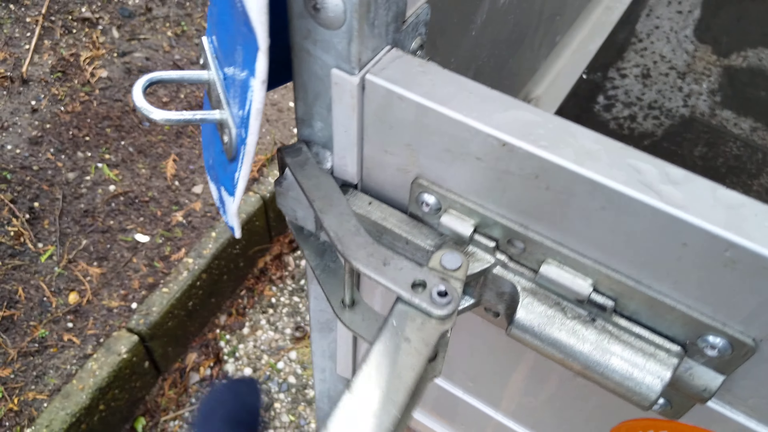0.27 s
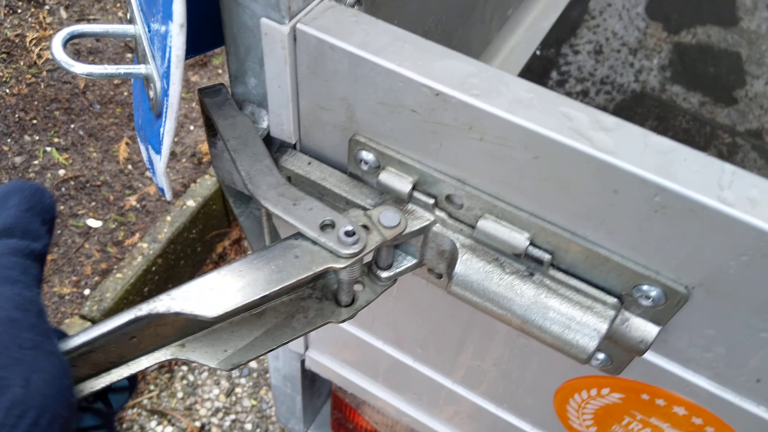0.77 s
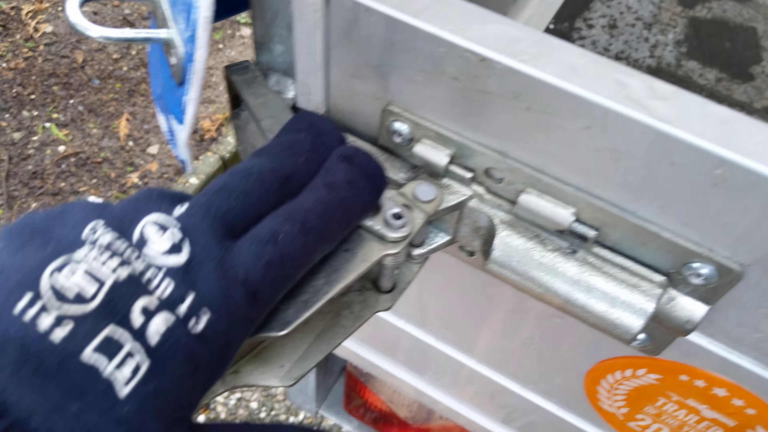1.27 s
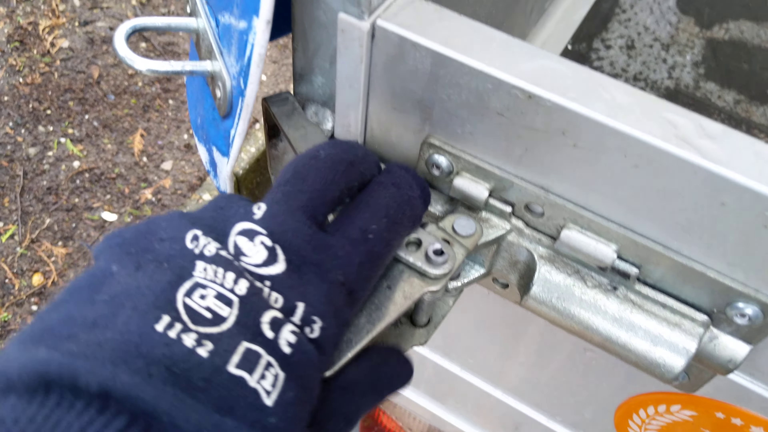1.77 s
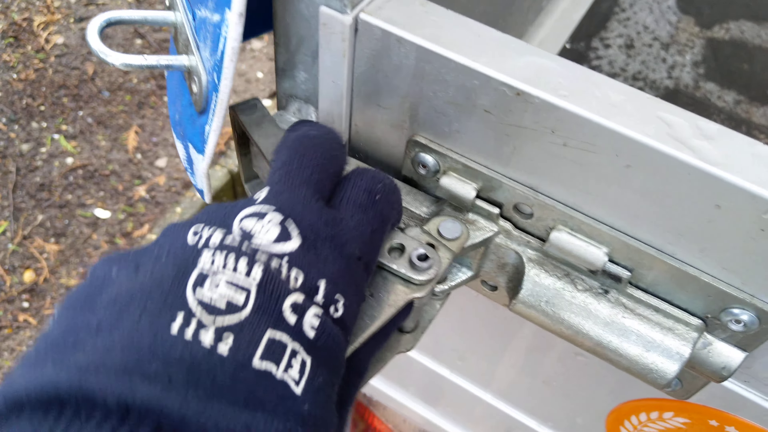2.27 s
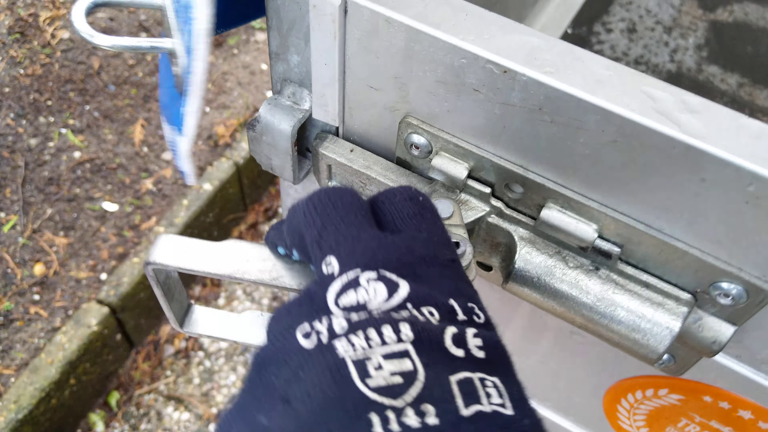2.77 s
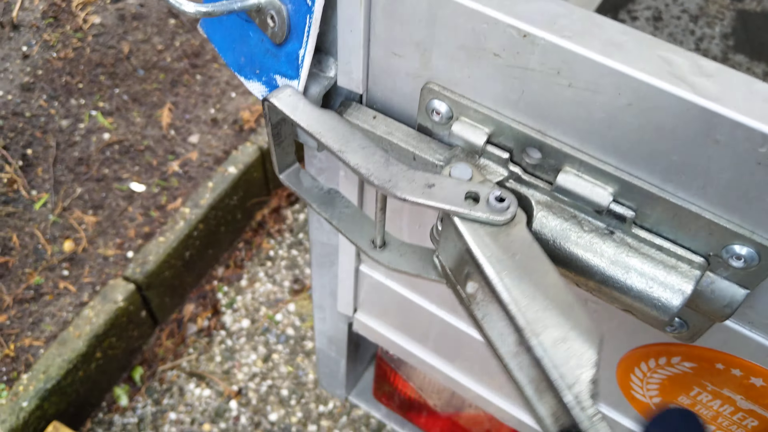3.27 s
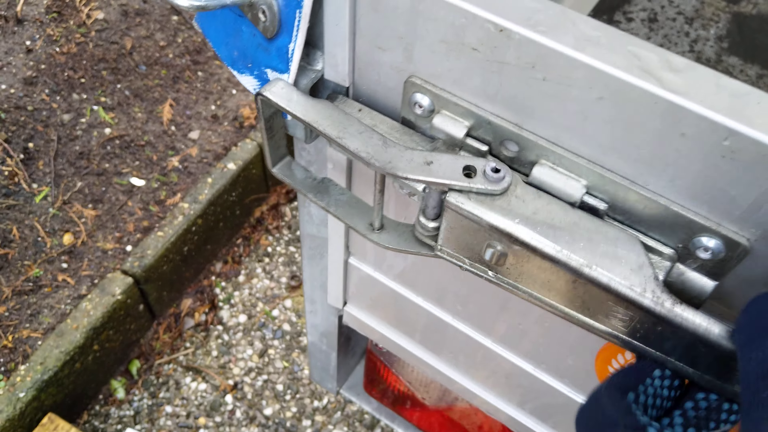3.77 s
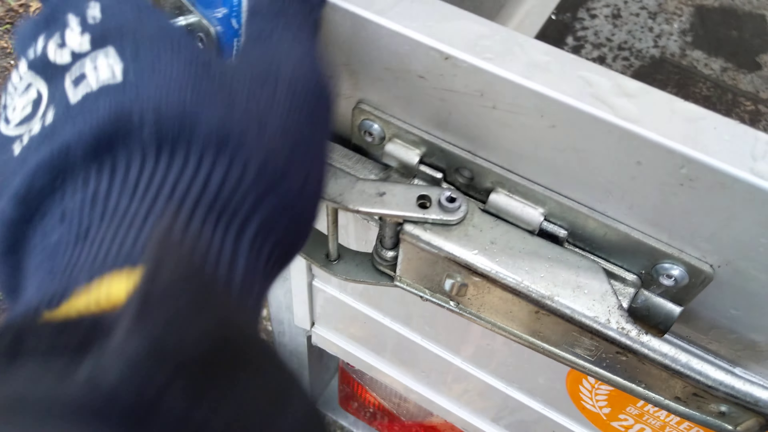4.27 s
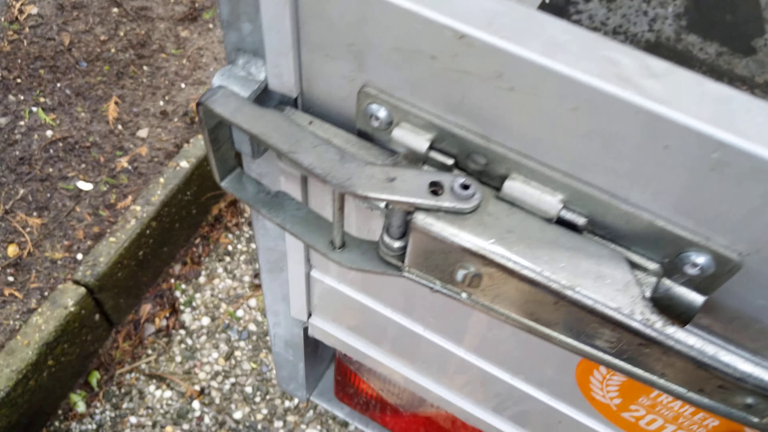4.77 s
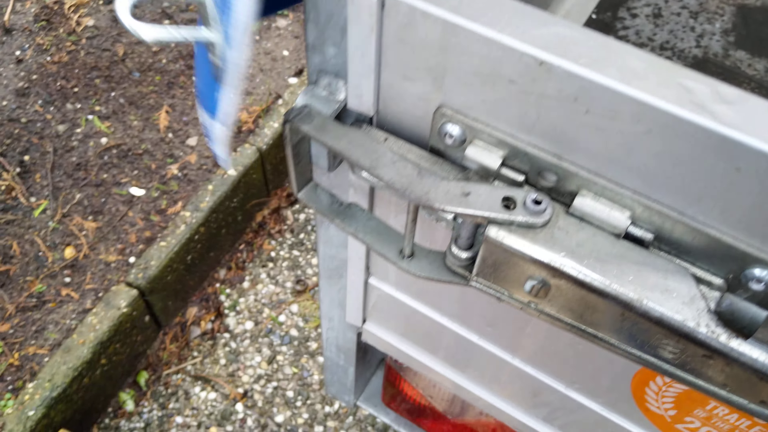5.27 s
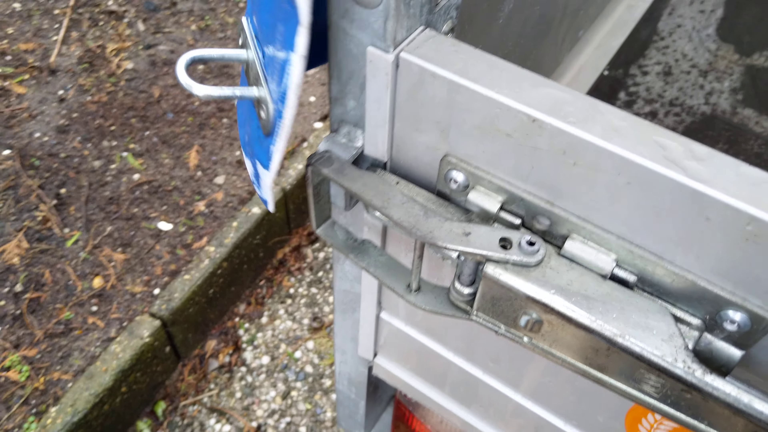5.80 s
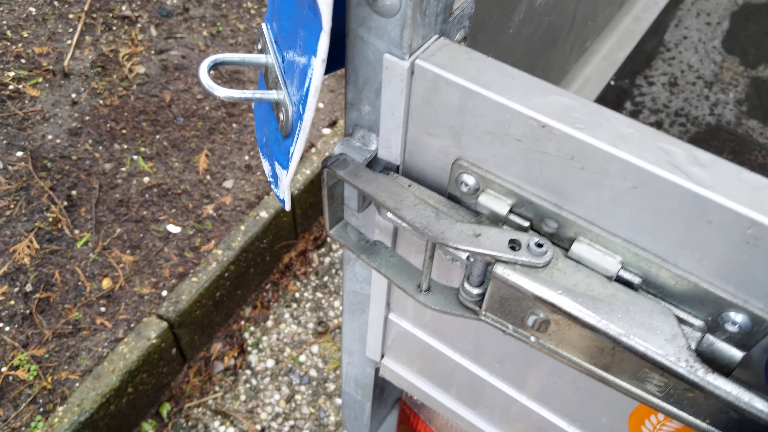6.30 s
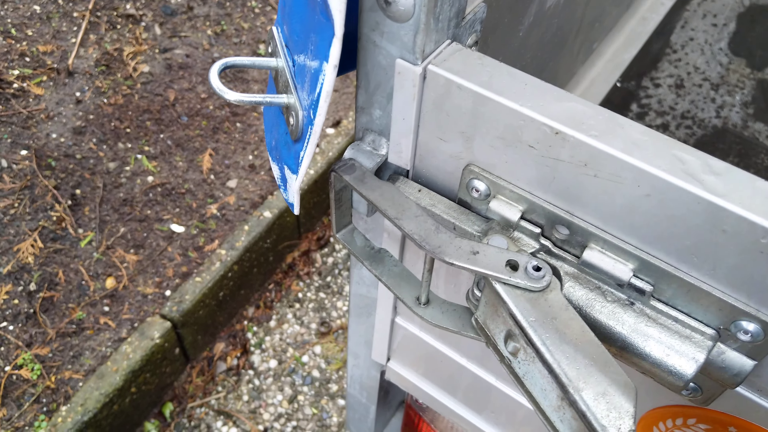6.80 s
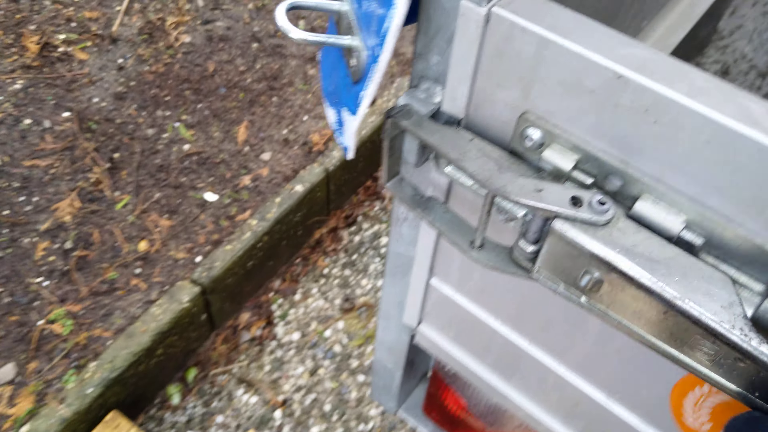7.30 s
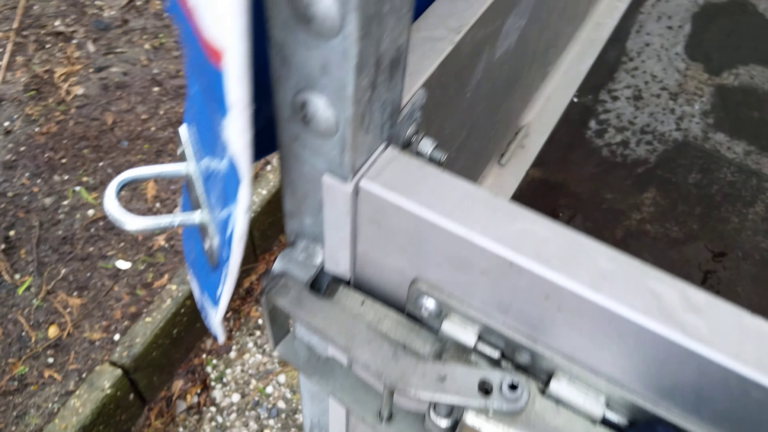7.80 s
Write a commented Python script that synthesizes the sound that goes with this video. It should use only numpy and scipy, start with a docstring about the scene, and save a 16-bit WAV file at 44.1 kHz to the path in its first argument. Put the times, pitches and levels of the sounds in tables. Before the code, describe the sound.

Outdoors, against a faint hum of distant town, a steel latch on a hollow metal trailer gate is worked near the microphone. Five sharp clacks come at uneven intervals, each with a short ring, and a dull knock hits the microphone after the second. The gate thuds softly in its frame. Just past the middle, steel scrapes briefly along steel, followed by small pin clicks and sleeve rustle before the final clack.

```python
"""A gloved hand works the steel over-centre latch on an aluminium trailer gate, outdoors, near a phone.
First the lever clacks: a short crack, then the hollow gate rings. The glove crackles, a second clack
comes and the phone is knocked. Two more clacks follow, with the gate thudding in its frame between them.
At about 4.6 s steel snaps free and scrapes along steel; light clicks and thuds lead to a last clack at
7.6 s. Sleeve and glove rustle now and then, and faint ticks dot the quiet town noise throughout."""
import sys
import numpy as np
from scipy import signal
from scipy.fft import rfft, irfft, next_fast_len
from scipy.io import wavfile
from scipy.ndimage import uniform_filter1d

SR = 44100
rng = np.random.default_rng(int(sys.argv[2]) if len(sys.argv) > 2 else 0)


def persist_wave(psi):
    """Save psi, clipped to +-1, as 16-bit WAV."""
    counts = np.round(np.clip(psi, -1, 1) * 32767).astype(np.int16)
    wavfile.write(sys.argv[1], SR, np.atleast_2d(counts).T)


N = 354828
RING_SIZE, TICK_SIZE = 24576, 2048  # samples set aside for one ring and for one tick
MEDIUM_CONTACT_HZ = 4000  # treble cut-off of a medium-hard hit


# Hard hits of the lever: t/s, level/dB, treble cut-off f/Hz, struck spot f/Hz, bounce spot f/Hz,
# bass/dB, treble/dB, gate ring/dB, lever ring/dB
LEVER_HITS = [(0.2099, -18.5, 10200, 1980, 5440, 6.5, 8.5, -1.5, -1),
              (1.2419, -17, 3970, 1510, 3200, -4.5, 0, -7, -14.5),
              (2.0590, -9, 3850, 1040, 3050, 6, -13.5, -6.5, -26),
              (3.8357, -11.5, 4050, 1156, 7130, 0.5, 2.5, -3, -14),
              (7.6073, -9.3, 3560, 1280, 1300, -0.5, 1.5, -8, -13)]
def latch(bounce_s=0.0041):
    """The lever slams against a stop, then bounces once onto a second spot, thinner and with less ring."""
    out = np.zeros((2, N))
    for s, db, cutoff_hz, spot_hz, bounce_hz, bass_db, treble_db, gate_db, lever_db in LEVER_HITS:
        add(out, s, undb(db) * blow(cutoff_hz, spot_hz, bass_db, treble_db, gate_db, lever_db))
        bounce = blow(max(cutoff_hz, bounce_hz), bounce_hz, bass_db - 15, treble_db - 0.5,
                      gate_db - 5, lever_db - 5)
        add(out, s + bounce_s, undb(db - 3.5) * bounce)
    return out


# Tone of the crack as metal meets metal: f/Hz, level/dB
CRACK_TONE = [(50, -29), (200, -5), (550, -3.5), (1100, 3.5), (1800, -11), (3400, -7), (4600, -14.5),
              (6000, -11), (9000, -19), (16000, -39)]
def blow(cutoff_hz, spot_hz, bass_db, treble_db, gate_db, lever_db):
    """One hit: a crack, then gate and lever ring. A softer contact lasts longer and sounds duller."""
    f = bins(RING_SIZE)
    contact = burst(decay_s=0.0037 * (MEDIUM_CONTACT_HZ / cutoff_hz) ** 0.56)
    crack = colour(stereo(contact, side_db=-0.5), causal(unit(undb(along(CRACK_TONE, f)))))
    bass, treble = 1 / (1 + (f / 380) ** 3), 1 / (1 + (1700 / f) ** 4)
    panel = undb(4.5) * crack + undb(gate_db) * gate_ring()
    panel = colour(panel, causal(undb(bass_db * bass + treble_db * treble)))
    lever = undb(lever_db) * lever_ring()
    spot = 1 + undb(2.0) * np.exp(-(np.log2(f / spot_hz) / 0.15) ** 2)  # each spot has its own pitch
    dulling = undb(-27) + 1 / np.sqrt(1 + (f / cutoff_hz) ** 12)
    return colour(panel + lever, causal(spot * dulling))


# Tone of the gate's ring: f/Hz, level/dB
GATE_TONE = [(50, -13.5), (120, -5), (190, 0), (350, -5), (550, 2), (1100, -4), (1350, -6), (1700, -11),
             (3300, -13.5), (4600, -16), (5700, -18.5), (8000, -17.5), (10000, -39), (16000, -39)]
# How long the gate takes to fade by 60 dB: f/Hz, ring time/s
GATE_RING_TIMES = [(100, 0.47), (1200, 0.35), (3000, 0.43), (7000, 0.42), (14000, 0.33)]
# The gate's strongest notes: f/Hz, level/dB, ring time/s
GATE_NOTES = [(184.3, -6.5, 0.24), (203, 1.5, 0.41), (297.3, 1, 0.27), (422.2, 2, 0.26), (536.7, 1.5, 0.45),
              (550, -9, 0.28), (621, -31, 0.28), (652, 1.5, 0.2), (750, -7, 0.31), (890, -27, 0.11),
              (988, 7, 0.24), (1046, -0.5, 0.34), (1217, -7, 0.45), (1327, 7, 0.22)]
def gate_ring(notes_db=-10, swell_s=0.007, patchy_db=2.5):
    """Countless notes of the hollow gate swell and die together; where it is hit favours some of them."""
    t, f = np.arange(RING_SIZE) / SR, bins(RING_SIZE)
    groups_hz = np.geomspace(100, SR / 2, 260)
    favoured = unit(undb(patchy_db * np.interp(f, groups_hz, rng.standard_normal(len(groups_hz)))))
    spectrum = rfft(stereo_noise(RING_SIZE)) * unit(undb(along(GATE_TONE, f))) * favoured
    wash = 0
    for hz, band in split_bands(spectrum, f, centres_hz=125 * 4. ** np.arange(5)):
        wash = wash + band * fade(t, along(GATE_RING_TIMES, hz))
    hz, db, ring_s = np.transpose(GATE_NOTES)
    return (wash + ringing(hz, db + notes_db, ring_s)) * (1 - np.exp(-t / swell_s))


# Notes of the steel lever: f/Hz, level/dB
LEVER_NOTES = [(2040, -1.5), (2100, -4.5), (2270, -1.5), (2770, -7), (3170, 4), (3400, 3), (3900, 1),
               (4650, 2), (5410, 4), (5750, -1), (6670, 2), (7400, 4.5), (7580, -7)]
def lever_ring(detune=0.00288, clang_db=12.0, clang_s=0.0028):
    """Two steel arms ring slightly out of tune and throb; a loud clang dies away fast, then a slower ring
    remains."""
    hz, db = np.transpose(LEVER_NOTES + LEVER_NOTES)  # one set for each arm
    detuned_hz = hz * (1 + detune * rng.standard_normal(len(hz)))
    clang = 1 + undb(clang_db) * np.exp(-np.arange(RING_SIZE) / SR / clang_s)
    return ringing(detuned_hz, db - 16.5, ring_s=0.32) * clang


# Tone of steel rubbing on steel: f/Hz, level/dB
SCRAPE_TONE = [(59, -47), (100, -35), (119, -26), (266, -5.5), (328, -17.5), (524, 1), (595, -7),
               (1200, -5), (1550, -13), (2520, -5), (3780, -11), (5300, -9.5), (8280, -19.5), (16000, -37)]
# Pitches at which the scraped steel sings: f/Hz, width/Hz, level/dB
SCRAPE_PEAKS = [(2570, 120, 0), (3336, 15, 9), (4630, 220, -2), (5060, 59, 4.5), (5500, 180, 3),
                (6750, 330, 5), (7750, 48, 4), (8130, 180, 9)]
def scrape(start_s=4.558, rise_s=0.061, hold_s=0.055, fall_db_per_s=144, ring_s=0.3):
    """Many tiny slips make the steel sing; it swells, holds and fades, brighter as the pressure eases."""
    f = bins(N)
    slips = rng.standard_normal((2, N))
    slips *= np.repeat(undb(0.5 * rng.standard_normal(N // 32 + 1)), 32)[:N]  # fine grain
    slips *= undb(1.1 * wander(130))  # uneven clusters
    peaks = 1 + sum(undb(db) / (1 + (2 * (f - hz) / width) ** 2) for hz, width, db in SCRAPE_PEAKS)
    steel = unit(colour(stereo(slips), undb(along(SCRAPE_TONE, f)) * peaks))
    treble = colour(steel, 1 / (1 + (3500 / f) ** 4))
    age = np.clip(np.arange(N) / SR - start_s, 0, 1)
    fall_db = fall_db_per_s * np.maximum(age - rise_s - hold_s, 0)
    strength = np.minimum(age / rise_s, 1) * undb(-20 - fall_db)
    brightness = undb(-1.5 + 27.5 * age)
    slide = (treble * brightness + (steel - treble) / brightness) * strength
    tail = unit(rng.standard_normal((2, RING_SIZE)) * fade(np.arange(RING_SIZE) / SR, ring_s))
    ring = signal.fftconvolve(slide, tail / np.sqrt(RING_SIZE), axes=1)[:, :N]
    return (undb(2) * slide + undb(-6) * ring) * undb([[.9], [-.9]])  # a little to the left


# Soft hits of the gate: t/s, level/dB, treble cut-off f/Hz, struck spot f/Hz, bass/dB
GATE_THUDS = [(.587, -25, 3220, 1560, 7.5), (2.3612, -29, 1250, 815, 10), (2.5235, -38, 1600, 690, 14),
              (2.9962, -30.5, 5670, 1140, 8), (3.039, -29.5, 8700, 580, 0), (3.047, -26.5, 970, 716, 16.5),
              (3.064, -28.5, 736, 147, 17), (4.479, -28, 4250, 1400, -8), (4.545, -28.5, 770, 497, 2.5),
              (5.129, -29.5, 1190, 690, -0.5), (5.873, -39, 6050, 1130, -14), (6.275, -39, 2970, 210, 10.5),
              (6.7107, -35, 3730, 730, -8), (6.868, -46, 1210, 510, 15), (7.481, -28.5, 1420, 606, 8.5)]
def thuds(db_per_octave=6):
    """The gate rocks in its frame: mostly the hollow panel sounds, brighter for a harder hit."""
    out = np.zeros((2, N))
    for s, db, cutoff_hz, spot_hz, bass_db in GATE_THUDS:
        treble_db = -3 + db_per_octave * np.log2(cutoff_hz / MEDIUM_CONTACT_HZ)
        thud = blow(cutoff_hz, spot_hz, bass_db, treble_db, gate_db=-3.5, lever_db=-18.5)
        add(out, s, undb(db) * thud)
    return out


# Light taps of the latch's pins: t/s, level/dB, treble cut-off f/Hz
PIN_CLICKS = [(.711, -38, 3900), (4.206, -37, 3400), (4.3606, -37.5, 3100), (4.5037, -26, 5900),
              (4.5637, -23, 14700), (5.272, -38.5, 2870), (5.306, -36.5, 2950), (5.47, -27, 13600),
              (5.7149, -38, 5000), (6.5203, -40, 10400), (6.543, -35.5, 4800)]
def clicks(db_per_octave=5.5):
    """Loose pins take up their slack with little ring; a harder click is brighter and higher."""
    out = np.zeros((2, N))
    for s, db, cutoff_hz in PIN_CLICKS:
        treble_db = 0.5 + db_per_octave * np.log2(cutoff_hz / MEDIUM_CONTACT_HZ)
        spot_hz, bass_db = 0.375 * cutoff_hz, treble_db - 7.5
        add(out, s, undb(db) * blow(cutoff_hz, spot_hz, bass_db, treble_db, gate_db=-16, lever_db=-14.5))
    return out


# Dull low bumps: the hand on the phone, and the hollow ring of a thud at 5.14 s.
# t/s, level/dB, f/Hz, decay/s
LOW_BUMPS = [(.0, -25.5, 74.4, 0.024), (.45, -29.5, 76, 0.14), (1.073, -23.5, 63.4, 0.028),
             (1.107, -21.5, 61, 0.024), (1.4154, -8, 192, 0.0017), (1.419, -14.5, 50, 0.01),
             (3.241, -28, 74.4, 0.023), (5.14, -29, 281.6, 0.048)]
# Tone of a knock on the phone's case: f/Hz, level/dB
KNOCK_TONE = [(40, -8), (250, -0.5), (700, -10), (1300, -15), (3000, -23), (6000, -33.5), (16000, -54)]
def bumps_and_knock(rise_s=0.0011, knock_s=1.4172, knock_db=-6.5):
    """Each bump is a short, low note that dies away; one sharp knock sounds on the phone's case."""
    out, t = np.zeros((2, N)), np.arange(RING_SIZE) / SR
    for s, db, hz, decay_s in LOW_BUMPS:
        envelope = np.exp(-t / decay_s) * (1 - np.exp(-t / rise_s))
        add(out, s, undb(db) * np.sin(2 * np.pi * hz * t) * envelope)
    case = causal(unit(undb(along(KNOCK_TONE, bins(RING_SIZE)))))
    add(out, knock_s, undb(knock_db) * colour(stereo(burst(decay_s=0.0025)), case))
    return out


# Strokes of sleeve and glove: middle t/s, half length/s, level/dB, centre f/Hz, width/octaves
CLOTH_STROKES = [(0.499, 0.074, -44.5, 440, 0.88), (1.138, 0.11, -55.5, 8500, 1.5),
                 (1.799, 0.11, -53, 3700, 1.05), (3.723, 0.55, -53, 7100, .66),
                 (5.202, 0.44, -49.5, 1940, 0.88), (5.606, .09, -46.5, 4700, 0.97),
                 (5.767, 0.023, -43.5, 4170, 0.57), (5.892, 0.032, -41, 4000, 0.51),
                 (6.252, 0.13, -47, 6300, 0.75), (6.341, 0.095, -46.5, 330, 2.05),
                 (6.577, 0.054, -55, 3500, 1), (6.763, .058, -53.5, 2540, 0.22),
                 (7.287, .088, -53.5, 7140, .67), (7.358, 0.027, -46.5, 835, 1)]
def cloth(rough_db=2.05):
    """Fabric brushes by in soft, slightly uneven swells of hiss."""
    out, f = np.zeros((2, N)), bins(RING_SIZE)
    t = (np.arange(RING_SIZE) - RING_SIZE / 2) / SR  # zero at the middle of a stroke
    soft_top = undb(-6 / (1 + (8800 / f) ** 16))
    for s, half_s, db, hz, octaves in CLOTH_STROKES:
        band = np.exp(-(np.log2(f / hz) / octaves) ** 2 / 2)
        hiss = unit(colour(stereo_noise(RING_SIZE), band * soft_top))
        swell = np.exp(-(t / half_s) ** 2 / 2) * signal.windows.tukey(RING_SIZE)
        add(out, s + t[0], undb(db) * hiss * swell)
    return out * undb(rough_db * wander(90))


def ticks(db, spread_db, low_hz, decay_s, count, from_s=0, to_s=N / SR):
    """Tiny random touches, most of them faint, pitched within an octave above low_hz."""
    out, f = np.zeros((2, N)), bins(TICK_SIZE)
    for when, strength, pitch in rng.random((count, 3)):
        band = unit(np.exp(-np.log2(f / (low_hz * 2 ** pitch)) ** 2))
        tick = colour(burst(decay_s, TICK_SIZE), causal(band))
        add(out, from_s + when * (to_s - from_s), undb(db + spread_db * strength ** 2) * tick)
    return out


# Tone of the distant town: f/Hz, level/dB
TOWN_TONE = [(15, -62), (25, -14), (64, 4), (161, -11), (195, -10.5), (335, -15.5), (531, -12), (962, -10),
             (1480, -20.5), (2480, -21), (2990, -24.5), (6050, -30), (6740, -27.5), (8830, -38.5),
             (16000, -48.5)]
# How the low rumble drops: t/s, level/dB
RUMBLE_LEVELS = [(3.5, -1), (4.2, -4)]
# Brief quieter moments: t/s
LULL_TIMES = [0.76, 1.51, 7.08]
def town(flicker_db=2.0, rumble_db=4.5, fall_db_per_s=0.24, lull_db=-4, lull_half_s=0.16):
    """Distant town noise slowly eases off; each octave wavers on its own, the rumble most."""
    t, f, out = np.arange(N) / SR, bins(N), 0
    spectrum = rfft(stereo_noise(next_fast_len(N, True))) * unit(undb(along(TOWN_TONE, f)))
    for hz, band in split_bands(spectrum, f, centres_hz=35 * 2. ** np.arange(10)):
        if hz < 200:
            waver_db = np.interp(t, *np.transpose(RUMBLE_LEVELS)) + rumble_db * wander(12)
        else:
            waver_db = flicker_db * wander(12)
        out = out + band[:, :N] * undb(waver_db)
    lulls = sum(np.exp(-((t - s) / lull_half_s) ** 2 / 2) for s in LULL_TIMES)
    return out * undb(-42.5 - fall_db_per_s * t + lull_db * lulls)


# How unlike the phone's two microphones sound: f/Hz, level/dB (unshared against shared sound)
STEREO_WIDTH = [(60, -43), (160, -21.5), (350, -14.5), (700, -5), (1400, -1.5), (3000, -0.5), (8000, 6)]
def stereo(pair, side_db=0):
    """Two unrelated signals become left and right: alike in the bass, unrelated in the treble."""
    side = undb(np.minimum(along(STEREO_WIDTH, bins(pair.shape[-1])) + side_db, 0))
    shared = 1 / np.sqrt(1 + side ** 2)
    return colour(pair[0], shared) + np.array([[1], [-1]]) * colour(pair[1], side * shared)


def stereo_noise(size):
    """Plain hiss for left and right."""
    return stereo(rng.standard_normal((2, size)))


def ringing(hz, db, ring_s):
    """Fading notes, each struck with a random strength; left and right hear them out of step."""
    strength, phase, spread = rng.standard_normal((len(hz), 3)).T
    poles = 2j * np.pi * hz / SR - np.log(1000) / (ring_s * SR)  # each note's turn and fade per sample
    block_starts = np.exp(np.outer(np.arange(0, RING_SIZE, 128), poles))
    within_block = np.exp(np.outer(poles, np.arange(128)))
    lag = np.array([[1], [-1]]) * spread * undb(along(STEREO_WIDTH, hz))
    drive = undb(db + 2 * strength) * np.exp(1j * (2 * np.pi * phase + lag))
    return ((drive[:, None] * block_starts) @ within_block).imag.reshape(2, -1)


def burst(decay_s, size=RING_SIZE):
    """Two dying puffs of noise, evenly spread from bass to treble."""
    age = np.arange(size) / SR / decay_s
    envelope = np.exp(-np.minimum(age, 60)) * (1 - np.exp(-6 * age))
    spectrum = rfft(rng.standard_normal((2, size)) * envelope)
    even = irfft(spectrum / np.abs(spectrum)) * np.sqrt(envelope)
    return unit(even) * np.sqrt(np.mean(np.exp(-2 * age)))


def split_bands(spectrum, f, centres_hz):
    """Give each centre frequency and the sound around it."""
    for hz, share in zip(centres_hz, np.eye(len(centres_hz))):
        yield hz, irfft(spectrum * np.interp(np.log(f), np.log(centres_hz), share))


def fade(t, ring_s):
    """Fall by 60 dB every ring_s seconds."""
    return np.exp(-np.log(1000) * t / ring_s)


def wander(rate_hz):
    """A smooth random drift, about 1 in size."""
    step = int(SR / rate_hz)
    stairs = np.repeat(rng.standard_normal(N // step + 1), step)
    return unit(uniform_filter1d(uniform_filter1d(stairs, step), step)[:N])


def undb(db):
    """Turn decibels into a gain."""
    return np.exp(np.asarray(db) * (np.log(10) / 20))


def bins(size):
    """The frequencies that make up a sound of this many samples."""
    return np.maximum(np.fft.rfftfreq(next_fast_len(size, True), 1 / SR), 1)


def along(table, hz):
    """Read between a table's rows, with octaves evenly spaced."""
    f, value = np.transpose(table)
    return np.interp(np.log(hz), np.log(f), value)


def colour(x, gain):
    """Turn each frequency up or down by its own gain."""
    size = next_fast_len(x.shape[-1], True)
    return irfft(rfft(x, size) * gain, size)[..., :x.shape[-1]]


def causal(gain):
    """Shape a filter so that nothing sounds before the hit (minimum phase)."""
    cepstrum = irfft(np.log(gain + 1e-7))
    half = len(cepstrum) // 2
    cepstrum[1:half] *= 2
    cepstrum[half + 1:] = 0
    return np.exp(rfft(cepstrum))


def unit(x):
    """Scale to an average strength (rms) of 1."""
    return x / np.sqrt(np.mean(np.abs(x) ** 2))


def add(out, s, sound):
    """Mix a sound in at s seconds."""
    i = int(np.clip(s * SR, 0, N - 1))
    out[:, i:i + sound.shape[-1]] += sound[..., :N - i]


def scene():
    """Everything that reaches the phone."""
    metal = latch() + thuds() + clicks() + scrape()
    glove_crackle = ticks(db=-58, spread_db=15.5, low_hz=6560, decay_s=0.0012, count=80,
                          from_s=0.85, to_s=1.9)
    bright_ticks = ticks(db=-60, spread_db=14, low_hz=7000, decay_s=0.0016, count=70)
    linkage_fidget = ticks(db=-55, spread_db=8, low_hz=1220, decay_s=0.0048, count=40)
    return metal + glove_crackle + bright_ticks + linkage_fidget + cloth() + bumps_and_knock() + town()


def record(dry, top_hz=16100):
    """The phone holds the peaks at full scale and cuts the highest treble."""
    return signal.sosfilt(signal.ellip(8, .2, 70, top_hz, fs=SR, output="sos"), np.clip(dry, -1, 1))


dry = scene()
out = record(dry)
persist_wave(out)
```